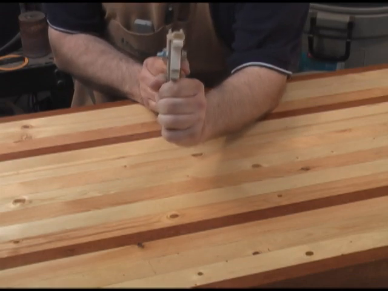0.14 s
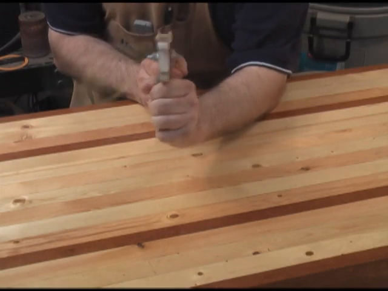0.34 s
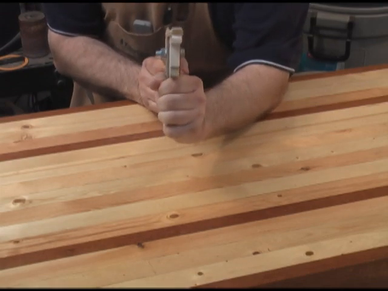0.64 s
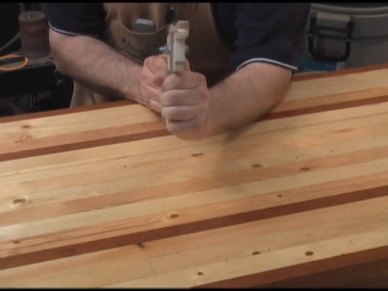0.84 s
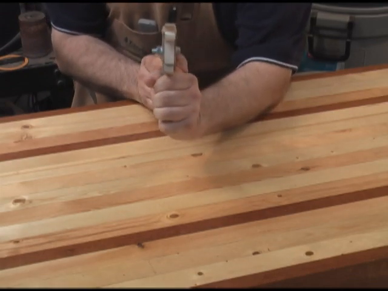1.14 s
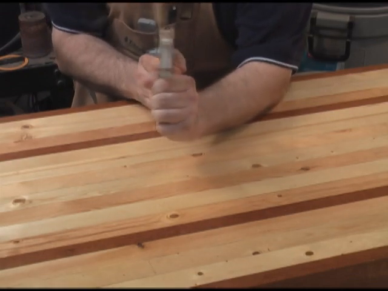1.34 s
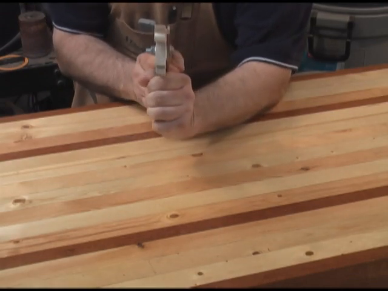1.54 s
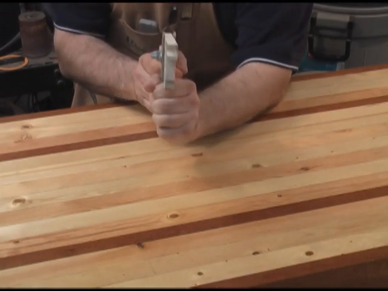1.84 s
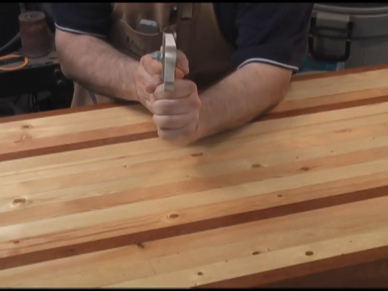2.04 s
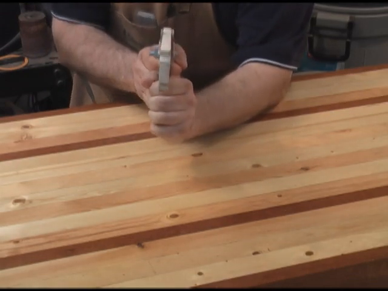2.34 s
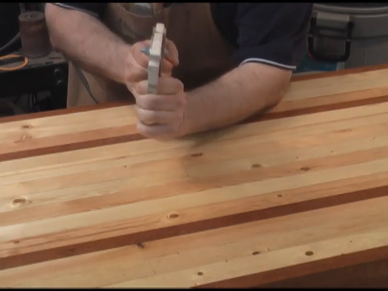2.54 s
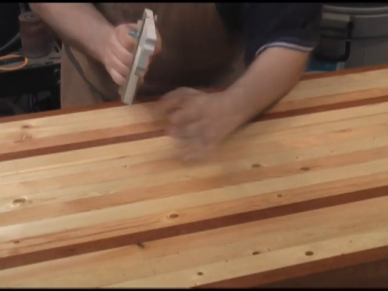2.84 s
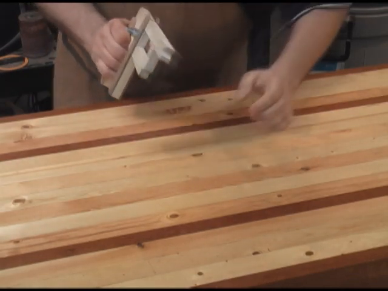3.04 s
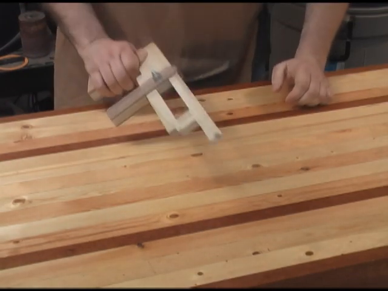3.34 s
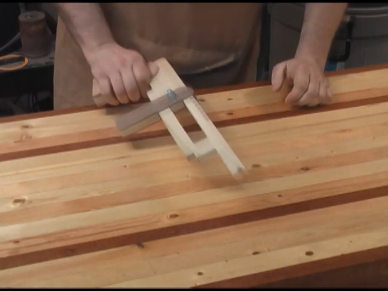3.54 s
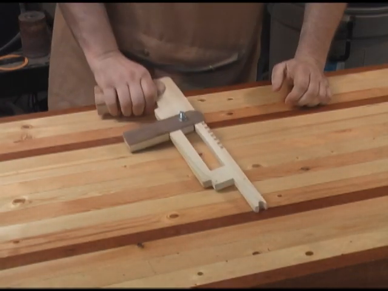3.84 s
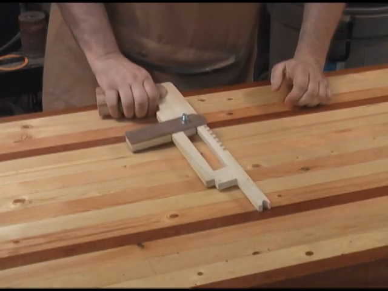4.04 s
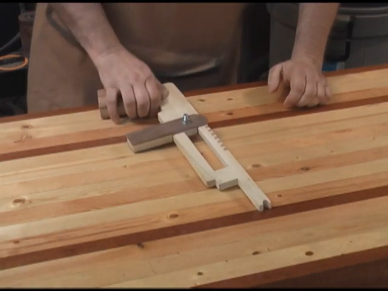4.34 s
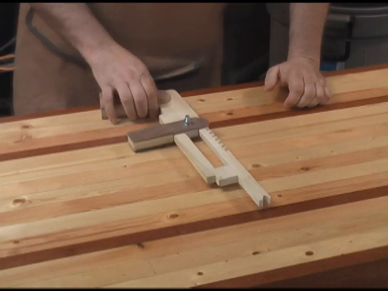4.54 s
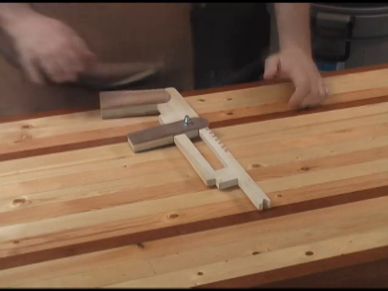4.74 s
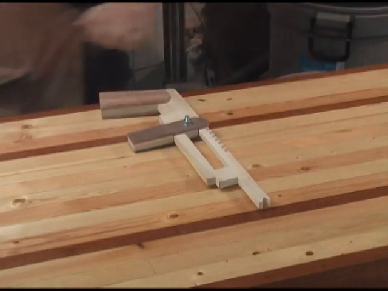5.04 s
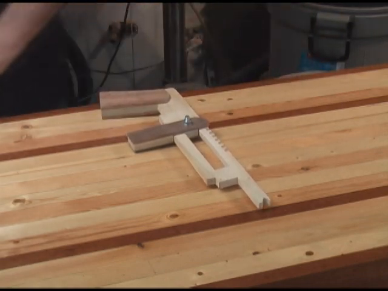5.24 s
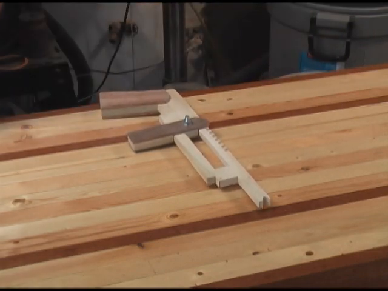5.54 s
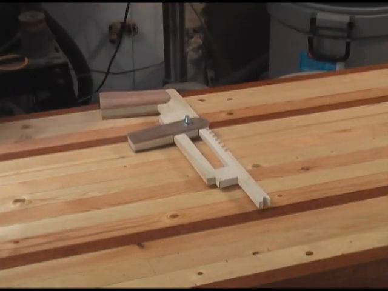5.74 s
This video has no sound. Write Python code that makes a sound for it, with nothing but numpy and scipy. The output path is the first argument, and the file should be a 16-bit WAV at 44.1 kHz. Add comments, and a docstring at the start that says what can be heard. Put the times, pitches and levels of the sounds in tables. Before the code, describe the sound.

Sharp rubber-band cracks snap in quick uneven bursts in a workshop, whirring and puffing past the microphone, then a wooden gun clacks onto a bench.

```python
"""In a live workshop, a wooden rubber band gun is fired towards a camera that carries the microphone.
Bands rip off their pegs as shaped noise, whirr close past with a puff on the diaphragms, or slap the camera.
A stool is shoved by stick-slip into resonances, loose things jingle, and sleeves brush as hissing noise.
The gun knocks on the wooden bench, then steps tap and scuff the floor: contact forces ringing modes.
Behind it lie a diffuse room tail, hush, a faint mains buzz and the hum of far machines."""
import sys
import numpy as np
from scipy import signal
from scipy.fft import rfft, irfft
from scipy.io import wavfile

SR = 44100
rng = np.random.default_rng(int(sys.argv[2]) if len(sys.argv) > 2 else 0)


def store_wav(level_fs):
    """Save 16-bit WAV to argv[1]."""
    pcm = np.round(np.clip(np.atleast_2d(level_fs), -1, 1) * 32767)
    wavfile.write(sys.argv[1], SR, pcm.T.astype(np.int16))


N = 259308
TIME = np.arange(N) / SR   # [s]

# bands leaving the gun: (time [s], crack towards the walls [dB], rip towards the microphone [dB], rip fall [s])
RELEASES = [(.359, -2, -18, 0.0018), (0.374, 5, -26, 0.0022), (0.435, -13, -24, 0.0023),
            (0.895, -1.5, -40, 0.0029), (0.934, 2.5, -36, 0.0028), (1.034, 5.5, -44, 0.0047),
            (1.25, -11, -37.5, 0.0011), (1.356, 6.5, -25.5, 0.0032), (1.409, 10, -23, 0.0044),
            (1.469, 9.5, -25, 0.0025), (1.54, 10, -58, 0.003), (1.6965, 15.5, -13.5, 0.000668),
            (1.746, -0.5, -29.5, .004)]
# colour of the crack sent to the walls: (frequency [Hz], density [dB per Hz])
CRACK_COLOUR = [(180, -31), (320, 2.5), (1400, -5.5), (2400, -2.5), (4300, -7.5), (6500, -10.5), (8200, -6),
                (9600, -3.5), (11500, -10.5), (14200, -24), (16000, -22)]
# colour of the rip heard straight on: (frequency [Hz], density [dB per Hz])
RIP_COLOUR = [(300, -22), (900, -7), (2000, -15), (5000, -14.5), (7000, -12), (9200, 1.5), (10500, -9),
              (13000, -14), (16000, -21)]
# resonances of the gun's wooden frame: (frequency [Hz], level [dB], t60 [s])
GUN_MODES = [(785, -5, 0.0113), (1053, -1.5, 0.032), (1400, -14, 0.0066), (1720, -27.5, 0.021),
             (1960, 7.5, 0.0061), (2240, 4, 0.0103), (2740, 5.5, 0.006), (3350, 8, 0.0055),
             (4020, -3, .006), (4600, 1, 0.0031), (6000, -6, 0.018), (8300, -42, 0.008),
             (8830, -4.5, 0.036), (9400, 4.5, 0.01)]
JOLT_DB = -60   # blow to the frame, relative to the crack

# bands flying close past: (time [s], puff level [dB], left over right [dB], whirr level [dB], flight [s])
PASSES = [(.457, -25.5, -4, -30, 0.046), (.989, -14.5, -5, -29, 0.095), (1.077, -16.5, -2, -28, 0.052),
          (1.401, -13.5, -15.5, -24.5, 0.034), (1.4428, -9, 8.5, -19, 0.027),
          (1.505, -18.5, -5, -24, 0.037), (1.5646, -12, 6, -27, .029), (1.7232, -10, -5.5, -28.5, 0.04)]
# colour of the whirr: (frequency [Hz], density [dB per Hz])
WHIRR_COLOUR = [(120, -26.5), (200, 1.5), (880, -1), (1720, -1.5), (2020, -2), (5170, -14.5), (8570, -11.5),
                (15000, -22)]
PUFF_HZ = 116   # swing of the diaphragms

# bands slapping the camera: (time [s], slap towards the walls [dB], crackle [dB], hold [s], left over right [dB])
SLAPS = [(0.4545, -11, -12, .0039, 7), (0.9448, -21.5, -25, 0.0024, 0.5), (1.073, -40.5, -47, 0.0024, -4),
         (1.505, -7.5, -8, 0.004, 1.5), (1.512, -21, -23, .0024, -3.5), (1.7247, -4.5, -10, 0.0065, 0)]
# colour of the crackle up close: (frequency [Hz], density [dB per Hz])
SLAP_COLOUR = [(120, -37.5), (200, -3.5), (1520, -1), (3250, -3.5), (4620, -9.5), (5550, 0), (6930, -6.5),
               (10200, -4.5), (15000, -19.5), (16500, -33)]
# colour of a slap as the walls receive it: (frequency [Hz], density [dB per Hz])
SLAP_ECHO_COLOUR = [(200, 11), (800, 7.5), (1200, 23), (2000, 17), (2400, 11.5), (2900, 16), (4500, 11.5),
                    (10000, 9.5), (16000, 0)]

# gun on the bench: (time [s], level [dB], bass [dB], treble [dB])
KNOCKS = [(3.841, -14, -5, -3.5), (3.88, -18.5, -10.5, -11), (4.131, -37.5, -2, 4), (4.336, -23.5, 7, -22),
          (4.342, -10.5, -12, -35), (4.362, -16.5, -5, -36), (4.377, -23.5, 7, -39),
          (4.392, -18.5, -2, -33), (4.407, -31, -22, -35), (4.421, -28.5, 3, -32), (4.533, -22, 18, -15),
          (4.55, -11, 8, -48)]
# resonances of the bench: (frequency [Hz], level [dB], t60 [s])
BENCH_MODES = [(249, 14, 0.49), (399, -4, 0.06), (570, 3, .04), (665, 4, .035), (747, 6, .04),
               (955, 2, .03), (1097, -2, .06), (1397, -2, 0.048), (1720, -2, .05)]

# shoves of the stool: (time [s], frame [dB], upper modes [dB], drag [s], jerk as the legs break loose [dB])
SHOVES = [(.772, -44, -60.5, 0.055, -51), (2.335, -32, -49, 0.19, -43), (2.507, -17, -27, 0.081, -23)]
# low resonances of the stool's frame: (frequency [Hz], level [dB], t60 [s])
STOOL_LOW_MODES = [(201.6, -11, 0.068), (216, -11.5, 0.031), (263.5, 5, 0.21), (275, -2.5, 0.047),
                   (338, 2.5, 0.0724), (350, -4, 0.035), (410, -2, 0.066), (388, 4, 0.17),
                   (487, -7.5, 0.037), (488, -4.5, 0.025), (523, -16, .04)]
# upper resonances of the stool: (frequency [Hz], level [dB], t60 [s])
STOOL_HIGH_MODES = [(690, -8, 0.044), (820, -4, 0.023), (1095, 4, 0.0095), (1113, -18.5, 0.06),
                    (1307, -0.5, 0.028), (1440, -11.5, .12), (1558, 0.5, 0.028), (1920, 7, 0.00278),
                    (2610, -1, 0.0051), (2900, -6, 0.0063), (3230, -1, 0.005), (4100, 6, 0.0014),
                    (5260, -6, 0.0032)]
SHOVE_RISE_S, SHOVE_FALL_S = 0.001, 0.1
SHOVE_SAG_S = 0.38   # the push slackens during the drag
UPPER_LAG_S, UPPER_RISE_S, UPPER_FALL_S = 0.0073, 0.0054, 0.089   # the upper modes come in later
JUDDER_HZ, JUDDER_DEPTH = 72, 0.24   # the slips grow stronger and weaker at this rate

# loose things stirred after the last shot: (time [s], jingle [dB], slide [dB], rumble [dB])
STIRS = [(1.765, -35.5, -34, -49), (1.88, -27, -42.5, -39), (2.192, -53, -44, -59.5)]
# resonances of small metal things: (frequency [Hz], level [dB], t60 [s])
METAL_MODES = [(3200, -4.5, .004), (4410, -4, 0.006), (5100, 6.5, 0.0012), (6310, -0.5, 0.01),
               (7100, 1.5, 0.0026), (8020, -1.5, 0.0058), (8700, -1.5, 0.0026), (9780, -5, 0.0017)]
# resonances of sliding wooden things: (frequency [Hz], level [dB], t60 [s])
SLIDE_MODES = [(533, -12.5, 0.046), (806, -14, 0.064), (1080, -1, 0.01), (1457, -7.5, 0.012),
               (1900, 4.5, 0.00091)]
STIR_RISE_S, JINGLE_FALL_S, SLIDE_FALL_S, RUMBLE_FALL_S = 0.025, 0.053, 0.13, 0.025

# feet and elbows on wood: (time [s], level [dB], bass [dB], treble [dB])
STEPS = [(2.9088, -41.5, 4, -33), (4.8179, -49.5, 12, -17.5), (4.8394, -41, 6.5, -13),
         (4.8994, -44.5, 2, -14), (5.1674, -44.5, 6.5, -27), (5.4154, -56, 18.5, -19.5),
         (5.6486, -57, 11.5, -15), (5.8361, -41.5, 4.5, -27), (5.8594, -43, -8, -29)]
# soles scuffing the floor: (time [s], level [dB], drag [s])
SCUFFS = [(4.845, -52, 0.14), (5.172, -55, 0.061), (5.415, -57, 0.072), (5.65, -55.5, 0.12),
          (5.839, -55, .02)]
# resonances heard under the shoes: (frequency [Hz], level [dB], t60 [s])
SHOE_MODES = [(253, -3.5, 0.037), (403, -5, 0.067), (444, -13, 0.045), (510, -9.5, 0.075), (753, -5, 0.014),
              (1052, -15.5, 0.042), (1413, -5, 0.01)]
SCUFF_RISE_S, SCUFF_FALL_S = 0.0064, 0.075

# sleeves and palms brushing: (time [s], level [dB], hold [s], fade [s])
BRUSHES = [(0.035, -60, .004, 0.0098), (0.12, -63, .004, 0.012), (0.732, -59, 0.078, 0.014),
           (2.41, -46, 0.0035, 0.047), (2.67, -48, .005, 0.037), (2.792, -50, 0.0086, .1),
           (3.052, -47.5, 0.063, 0.11), (3.194, -49, 0.081, 0.041), (4.822, -56, 0.036, 0.19),
           (5.831, -49.5, 0.017, .05)]
# colour of rubbing cloth and skin: (frequency [Hz], density [dB per Hz])
CLOTH_COLOUR = [(880, -4), (1500, -1), (2270, -1.5), (2640, -4.5), (3000, -4), (5280, -5.5), (10100, -2),
                (14100, -17), (16000, -22)]
BRUSH_RISE_S = 0.013

# colour of room hush and microphone hiss: (frequency [Hz], density [dB per Hz])
AIR_COLOUR = [(18, -45.5), (30, -28), (48, -5), (109, -3.5), (199, -2.5), (280, -16.5), (303, -6),
              (512, -11), (684, -11.5), (1460, -13.5), (1860, -19.5), (2120, -18), (3220, -23.5),
              (7870, -26), (13500, -31), (16000, -50)]
AIR_DB = -56   # before the rumble filter
# hum of far machines: (frequency [Hz], rms level [dB])
HUM = [(59.5, -67.5), (149, -68.5), (244, -66)]
# resonances rung by each tick of the mains buzz: (frequency [Hz], level [dB], t60 [s])
BUZZ_MODES = [(2250, -58, .006), (2700, -54, .007)]
BUZZ_PER_S, BUZZ_START_S = 59.94, 0.0105   # one tick per mains cycle

# decay of the workshop: (frequency [Hz], t60 [s])
SHOP_T60 = [(100, 0.45), (500, 0.51), (2000, 0.82), (6000, 0.4), (14000, 0.87)]
# how alike left and right are in the noises, wide below, mono on top: (frequency [Hz], likeness [0 to 1])
LIKENESS = [(60, 0.41), (180, 0.453), (550, 0.63), (1650, 0.4), (4970, 1), (15000, 1)]
CUTOFF_HZ = 16600   # nothing is heard above


def releases():
    """The band rips off its peg and jolts the frame; returns the direct sound and what goes to the walls."""
    rip = sum(amp(rip_db) * burst(s, 0.00036, fall) for s, _, rip_db, fall in RELEASES)
    jolts = [(s, crack_db + JOLT_DB, -6, -6) for s, crack_db, *_ in RELEASES]
    frame = ring(blows(jolts), GUN_MODES)
    direct = filtered(rip * noise(RIP_COLOUR)[0] + frame, 300, "high")
    to_walls = filtered(clicks(RELEASES, CRACK_COLOUR) + frame, 300, "high")
    return direct, to_walls


def passes():
    """The whirr swells over the flight; the wake sucks, then pushes the diaphragms and lets them swing back."""
    whirr = noise(WHIRR_COLOUR)
    turbulence = rng.standard_normal((2, N))
    lumps = rms_one(filtered(turbulence, [60, 500], "band"))
    out = 0
    for s, puff_db, lr_db, whirr_db, flight in PASSES:
        after = np.maximum(TIME - s, 0)
        swing = np.sin(2 * np.pi * PUFF_HZ * after) * np.exp(-after / 0.0027)
        suck = 0.86 * burst(s - 0.0006, 0.0011, 0.00013)
        puff = 1.23 * (swing - suck) + 0.38 * lumps * burst(s, 0.0038, 0.0031)
        out = out + amp(puff_db) * pan(lr_db) * puff
        swell = (TIME > s - flight) * burst(s, 0.74 * flight, 0.01)
        out = out + amp(whirr_db) * swell * whirr
    return out


def slaps():
    """The rubber lands along its length: a few milliseconds of dense crackle."""
    # so close that each port hears its own part
    crackle = noise(SLAP_COLOUR) + 0.5 * noise(SLAP_COLOUR)[0] * [[1], [-1]]
    level = sum(amp(db) * held(s, 0.00035, hold, 0.00063) * pan(lr_db) for s, _, db, hold, lr_db in SLAPS)
    return crackle * level


def knocks():
    """The contact clacks, the gun rings with other strengths at every blow, and the bench rings under it."""
    force = blows(KNOCKS)
    blow = np.searchsorted(np.array(KNOCKS)[:, 0], TIME + 0.00093)   # number of the current blow
    shares_db = rng.normal(0, 3, (len(KNOCKS) + 1, len(GUN_MODES)))
    gun = 0
    for mode, share_db in zip(GUN_MODES, shares_db.T):
        gun = gun + ring(force * amp(share_db[blow]), [mode])
    return amp(9.0) * force + amp(-18.5) * gun + amp(-25) * ring(force, BENCH_MODES)


def stool():
    """Stick-slip of the legs drives the frame and its upper modes; a jerk starts each shove."""
    judder = slips(per_s=980.0, spread_db=-1.5)
    judder = judder * (1 + JUDDER_DEPTH * np.cos(2 * np.pi * JUDDER_HZ * TIME))
    frame, upper = 0, 0
    for s, frame_db, upper_db, drag, _ in SHOVES:
        push = held(s, SHOVE_RISE_S, drag, SHOVE_FALL_S) * burst(s, np.inf, SHOVE_SAG_S)
        frame = frame + amp(frame_db) * push
        late = held(s + UPPER_LAG_S, UPPER_RISE_S, drag - UPPER_LAG_S, UPPER_FALL_S)
        upper = upper + amp(upper_db) * late
    jerk = np.zeros(N)
    jerk[[round(row[0] * SR) for row in SHOVES]] = amp(np.array(SHOVES)[:, 4])
    groan = rms_one(filtered(ring(judder, STOOL_LOW_MODES), 640, "low", order=4))
    scrape = rms_one(filtered(ring(judder, STOOL_HIGH_MODES), 900, "high"))
    low = frame * groan + ring(jerk, STOOL_LOW_MODES)
    high = upper * scrape + amp(-11) * ring(jerk, STOOL_HIGH_MODES)
    return filtered(low + high, 199, "high", order=6)


def rattle():
    """Dense small contacts in metal and in wood, over a low rumble; each stir swells and dies away."""
    jingle = filtered(ring(slips(per_s=4000.0, spread_db=3), METAL_MODES), 2000, "high")
    slide = filtered(ring(slips(per_s=1200.0, spread_db=0.5), SLIDE_MODES), 610, "high")
    rumble = filtered(rng.standard_normal(N), [65, 170], "band")
    parts = [(jingle, JINGLE_FALL_S), (slide, SLIDE_FALL_S), (rumble, RUMBLE_FALL_S)]
    out = 0
    for k, (part, fall) in enumerate(parts):
        level = sum(amp(levels[k]) * burst(s, STIR_RISE_S, fall) for s, *levels in STIRS)
        out = out + level * rms_one(part)
    return out


def feet():
    """Feet and elbows tap the wood; soles scuff the floor by stick-slip."""
    taps = blows(STEPS)
    drag = sum(amp(db) * held(s, SCUFF_RISE_S, length, SCUFF_FALL_S) for s, db, length in SCUFFS)
    scuff = drag * rms_one(ring(slips(per_s=330.0, spread_db=1.0), SHOE_MODES))
    both = amp(20.0) * taps + amp(-1.0) * ring(taps, SHOE_MODES) + scuff
    return filtered(both, 173, "high", order=4)


def rustle():
    """Cloth and skin hiss for as long as they rub."""
    rub = sum(amp(db) * held(s, BRUSH_RISE_S, hold, fade) for s, db, hold, fade in BRUSHES)
    return noise(CLOTH_COLOUR) * rub


def shop(x):
    """Diffuse room tail: octave bands of noise, each dying at its own rate, after a soft onset."""
    size = int(0.7 * SR)
    t = np.arange(size) / SR
    white = noise([(20, 0), (20000, 0)], size=size)
    tail = 0
    for k, low in enumerate(60 * 2.0 ** np.arange(8)):
        band = filtered(white, [low, 2 * low], "band")
        tail = tail + (-1) ** k * band * amp(-60 * t / at_hz(SHOP_T60, 1.18 * low))
    onset = 1 - np.exp(-(t / 0.0015) ** 2)
    near = 1 + 2.0 * np.exp(-t / 0.014)   # bench and near walls answer first
    tail = tail * onset * near
    return signal.fftconvolve(x[None], tail / np.sqrt(np.sum(tail ** 2) / 2), axes=1)[:, :N]


def air():
    """Room hush, microphone hiss, a faint mains buzz and far machines, each a narrow wavering line."""
    ticks = np.zeros(N)
    ticks[(np.arange(BUZZ_START_S, N / SR, 1 / BUZZ_PER_S) * SR).astype(int)] = 1
    ticks = ticks * amp(rng.normal(0, 3, N))   # uneven strength
    out = amp(AIR_DB) * filtered(noise(AIR_COLOUR), 53, "high", order=8) + ring(ticks, BUZZ_MODES)
    for hz, level_db in HUM:
        out = out + amp(level_db) * rms_one(ring(rng.standard_normal(N), [(hz, 0, 0.6)]))
    return out


def blows(rows):
    """Contact forces: a click with a ragged trail, its bass and treble set for each blow."""
    out = np.zeros(N)
    size = 882   # 20 ms
    for s, level_db, bass_db, treble_db in rows:
        trail = 0.085 * rng.standard_normal(size) * np.exp(-np.arange(size) / SR / 0.0058)
        ragged = trail + (np.arange(size) == 0)
        push = filtered(filtered(ragged, [1000, 4200], "band"), 6000, "low", order=1)
        # neighbouring bands meet in opposite phase, so they are subtracted
        push = push - amp(bass_db) * filtered(ragged, [540, 1100], "band")
        push = push - amp(treble_db) * filtered(ragged, [4200, 10500], "band")
        at = round(s * SR)
        out[at:at + size] += amp(level_db) * push[:N - at]
    return out


def slips(per_s, spread_db):
    """Random stick-slip clicks of uneven size and either sign; rms 1."""
    sizes = amp(spread_db * np.minimum(rng.exponential(1, N), 4)) * rng.choice([-1, 1], N)
    return rms_one(sizes * (rng.random(N) < per_s / SR))


def clicks(rows, spectrum):
    """One sharp click of a given colour per row, its level in the second column: a short crack to the walls."""
    train = np.zeros(N)
    train[[round(row[0] * SR) for row in rows]] = amp(np.array(rows)[:, 1])
    return irfft(rfft(train) * amp(at_hz(spectrum, np.arange(N // 2 + 1) * SR / N)), N)


def ring(force, modes):
    """A force signal sets every mode of a body ringing as a damped resonator."""
    out = 0
    for hz, level_db, t60 in modes:
        r, w = amp(-60 / (t60 * SR)), 2 * np.pi * hz / SR
        push = [0, amp(level_db) * np.sin(w)]
        out = out + signal.lfilter(push, [1, -2 * r * np.cos(w), r * r], force + 1e-18)
    return out


def noise(spectrum, size=N):
    """Stereo noise, the channels as alike as LIKENESS sets: partly separate below, mono in the treble; rms 1."""
    hz = np.arange(size // 2 + 1) * SR / size
    alike = np.clip(at_hz(LIKENESS, hz), 0, 1)
    mid, side = rfft(rng.standard_normal((2, size)))
    both = np.sqrt(1 + alike) * mid + np.sqrt(1 - alike) * side * [[1], [-1]]
    return rms_one(irfft(both * amp(at_hz(spectrum, hz)), size))


def burst(s, rise, fall):
    """Envelope that swells exponentially up to the moment s and dies after it."""
    return np.exp(-np.maximum((s - TIME) / max(rise, 1e-5), (TIME - s) / max(fall, 1e-5)))


def held(s, rise, hold, fall):
    """Envelope that swells up to the moment s, holds, then dies."""
    return np.minimum(burst(s, rise, np.inf), burst(s + hold, np.inf, fall))


def pan(db):
    """Gains that set the left channel db above the right."""
    return amp(np.array([[db / 2], [-db / 2]]))


def filtered(x, hz, kind, order=2):
    """Butterworth filter."""
    return signal.sosfilt(signal.butter(order, hz, kind, fs=SR, output="sos"), x)


def at_hz(points, hz):
    """A table read on a log-frequency axis."""
    table = np.array(points)
    return np.interp(np.log(np.maximum(hz, 1)), np.log(table[:, 0]), table[:, 1])


def amp(db):
    """Decibels to amplitude."""
    return 10 ** (np.asarray(db) / 20)


def rms_one(x):
    """Scale to an rms of 1."""
    return x / np.sqrt(np.mean(x ** 2) + 1e-20)


def scene():
    """Near sounds reach the microphone directly; the workshop answers with its tail."""
    (shots, cracks), legs, loose, steps = releases(), stool(), rattle(), feet()
    wood = filtered(knocks(), 146, "high", order=4)   # small bodies radiate no deep bass
    flying = filtered(passes(), 48.8, "high", order=1)
    to_walls = cracks + clicks(SLAPS, SLAP_ECHO_COLOUR) + amp(-8) * flying.mean(0)
    to_walls = to_walls + amp(-1.5) * wood + amp(1.5) * steps + amp(-6.5) * legs + amp(-1.5) * loose
    direct = shots + amp(-3.5) * wood + steps + legs + amp(-1.5) * loose
    return direct + slaps() + flying + shop(to_walls) + rustle() + air()


def record(dry):
    """Peaks are rounded, then the top is cut."""
    rounded = 1.2 * np.tanh(dry / 1.2)
    return signal.sosfilt(signal.cheby2(16, 95, CUTOFF_HZ, fs=SR, output="sos"), rounded)


dry = scene()
out = record(dry)
store_wav(out)
```